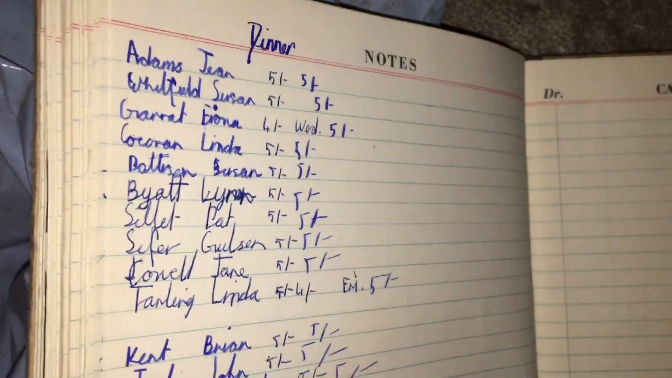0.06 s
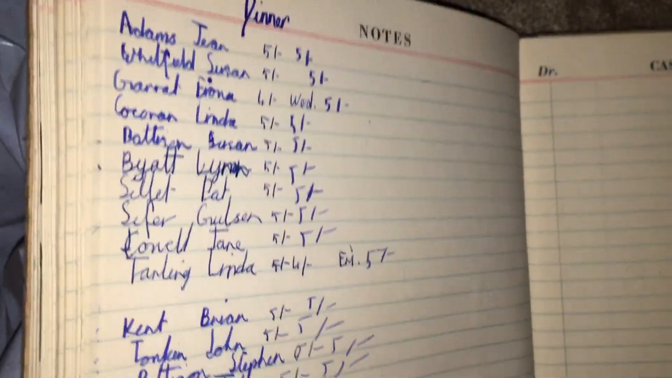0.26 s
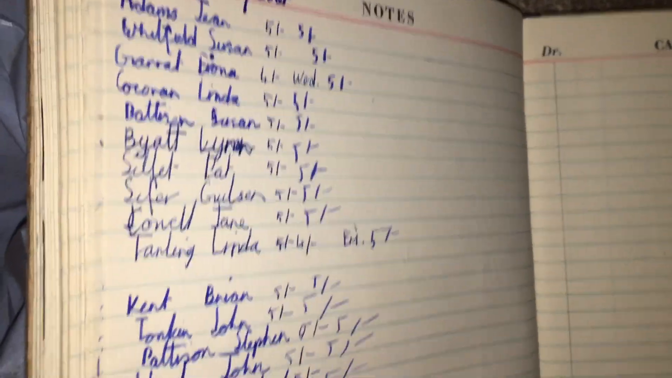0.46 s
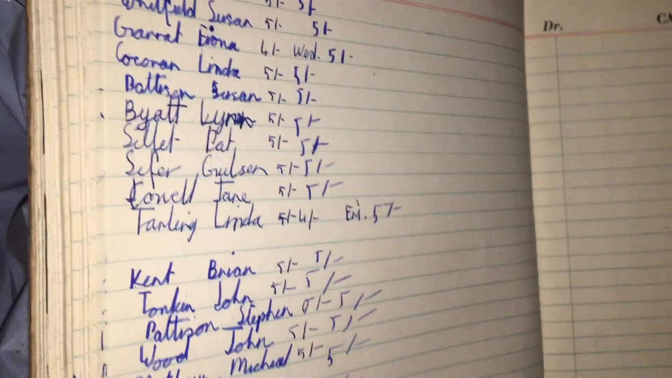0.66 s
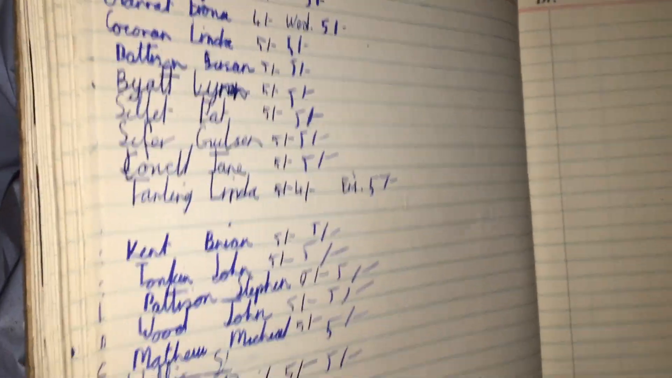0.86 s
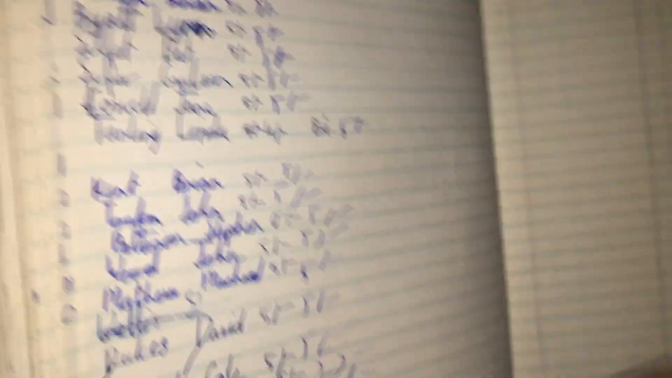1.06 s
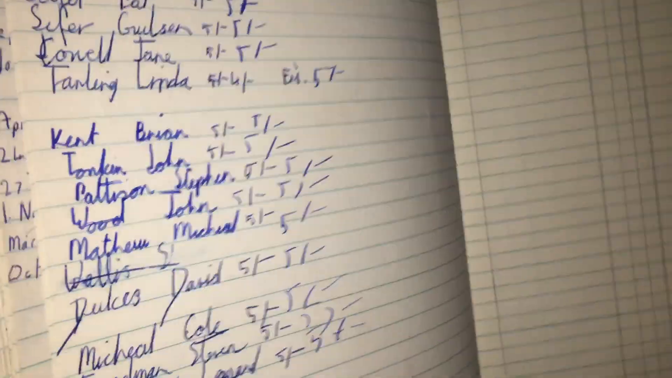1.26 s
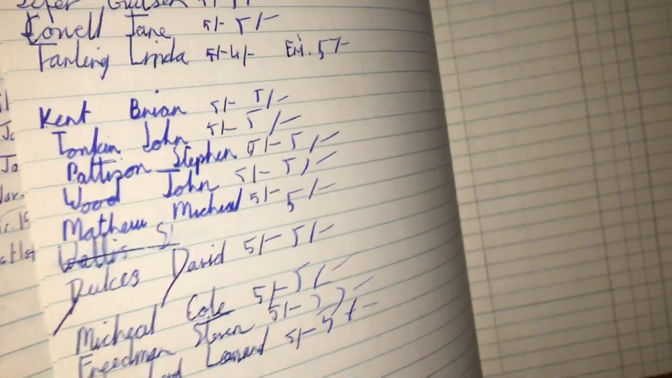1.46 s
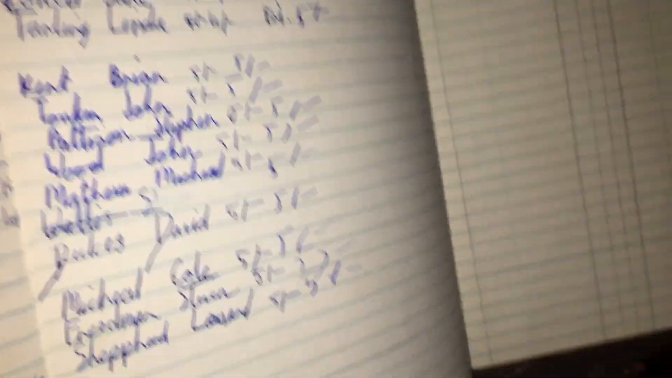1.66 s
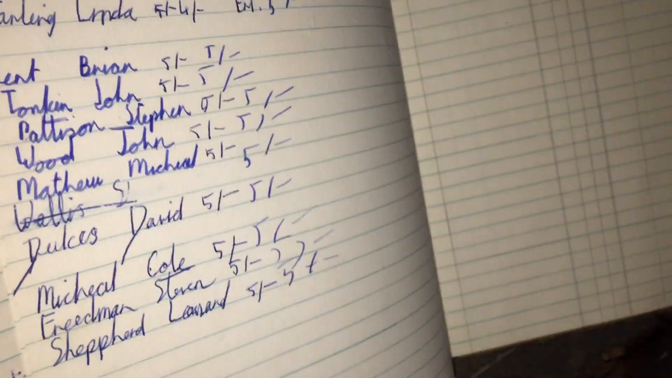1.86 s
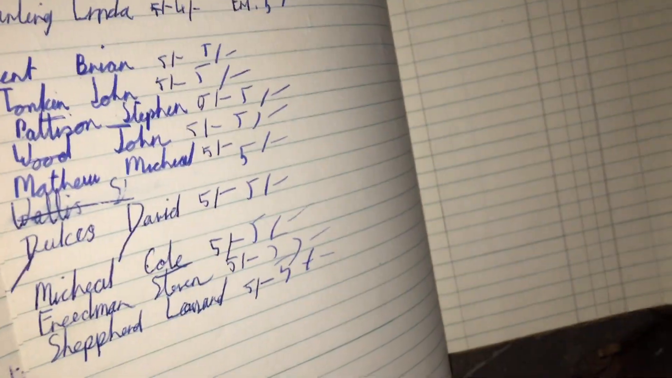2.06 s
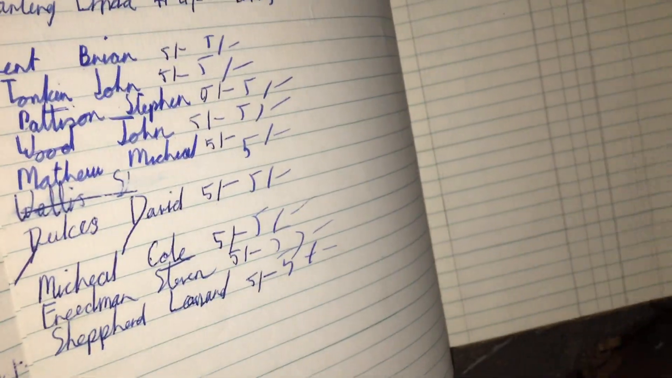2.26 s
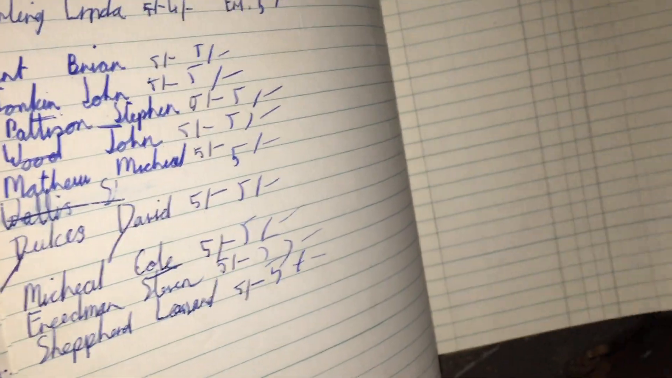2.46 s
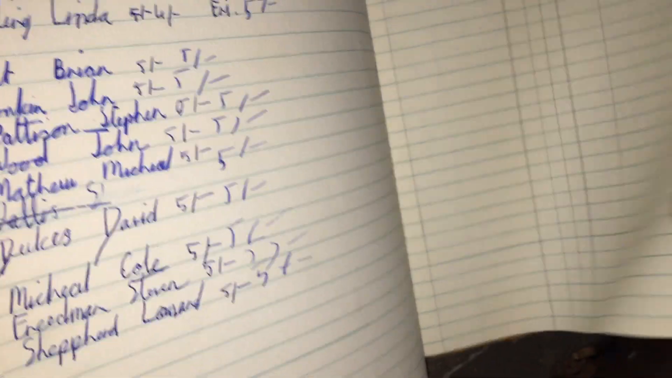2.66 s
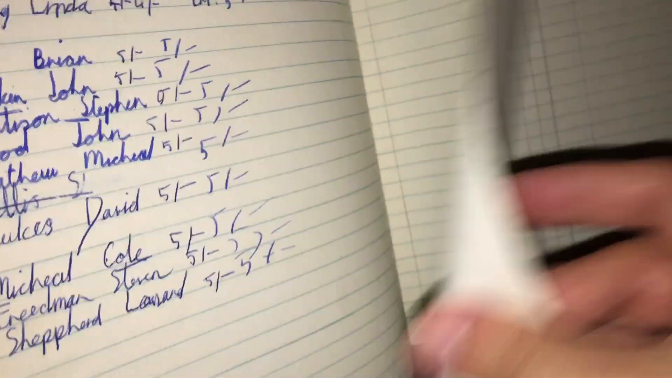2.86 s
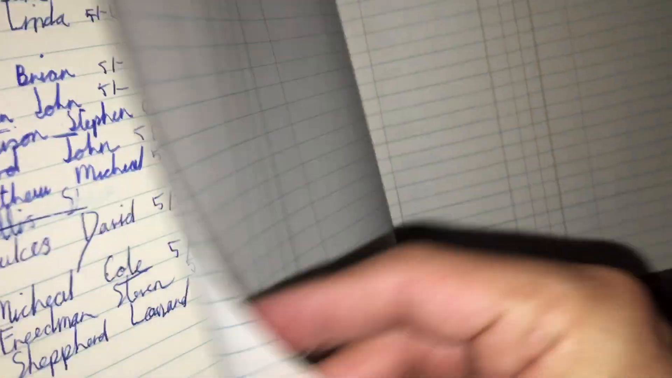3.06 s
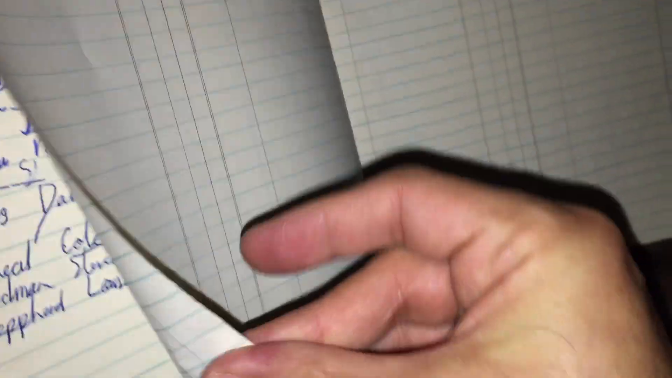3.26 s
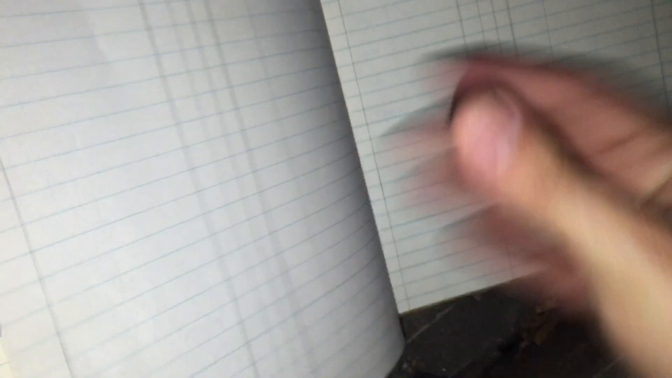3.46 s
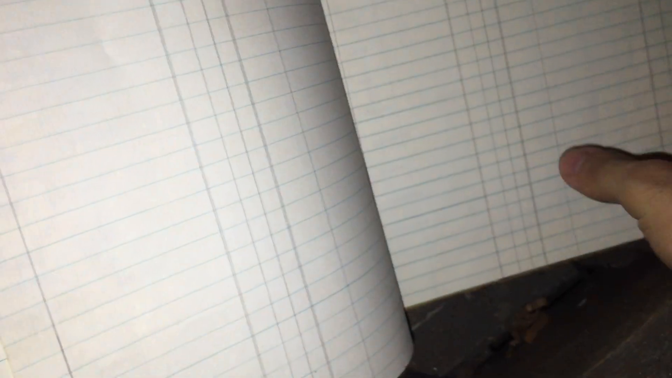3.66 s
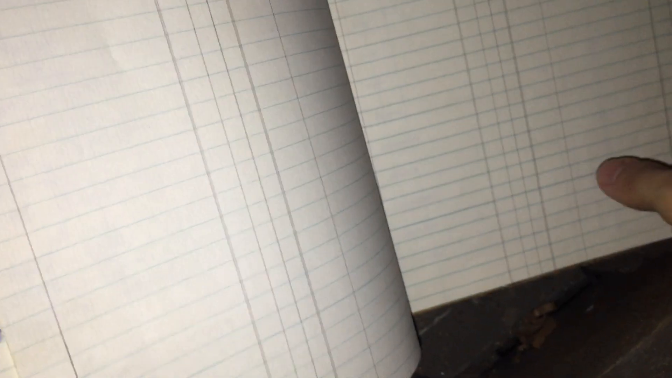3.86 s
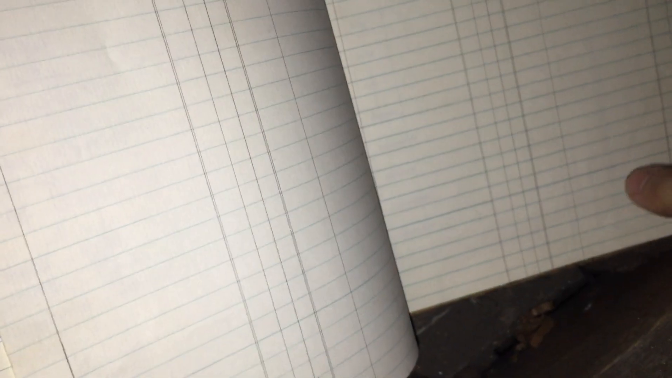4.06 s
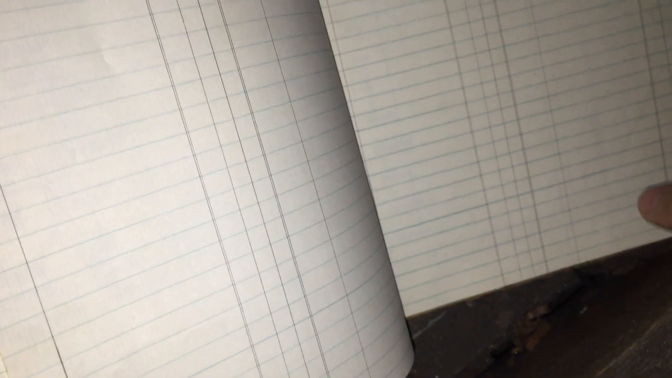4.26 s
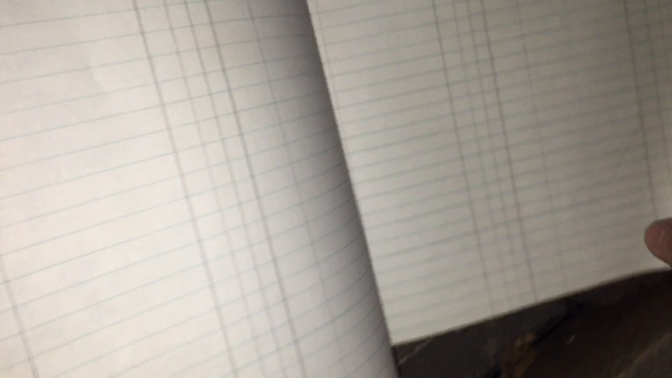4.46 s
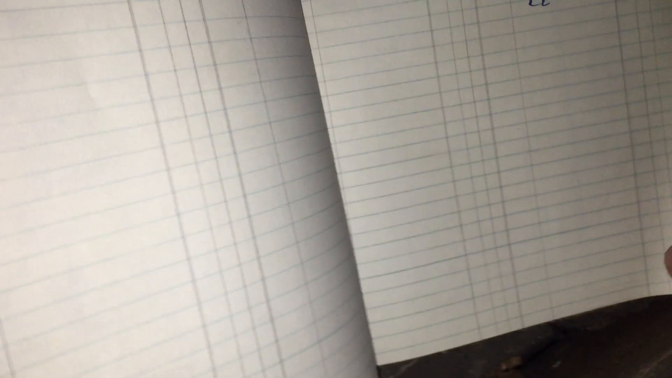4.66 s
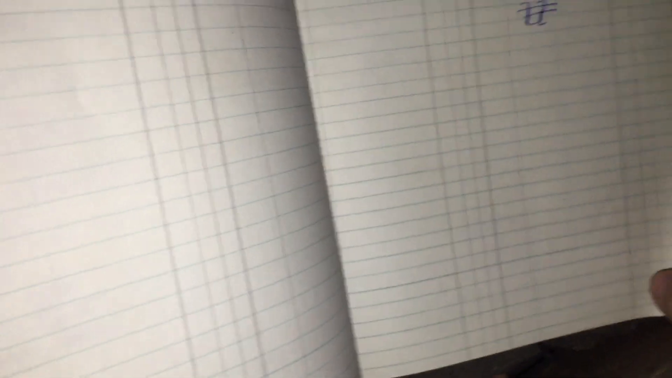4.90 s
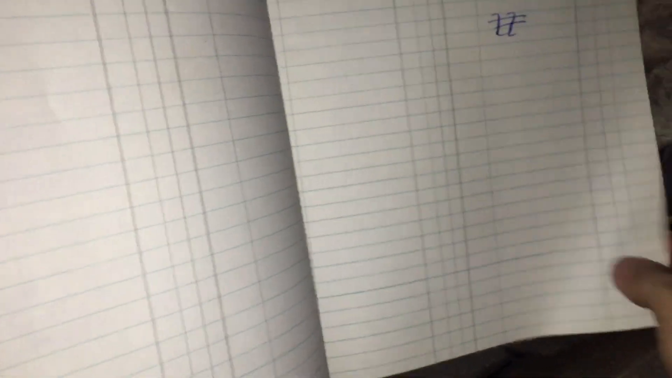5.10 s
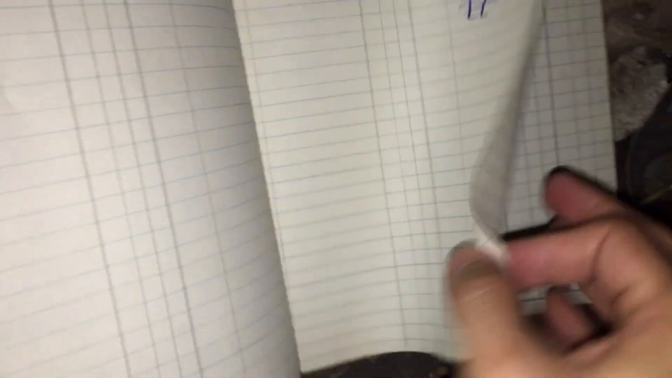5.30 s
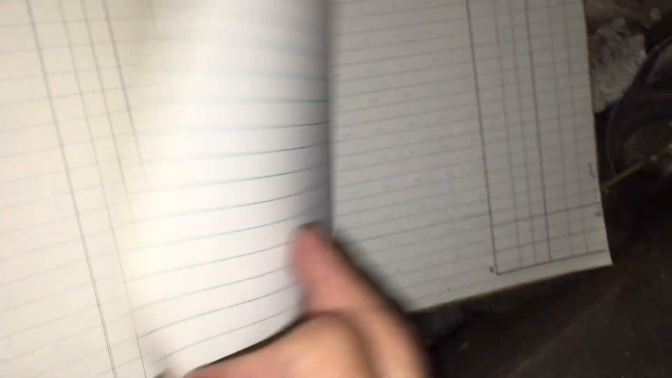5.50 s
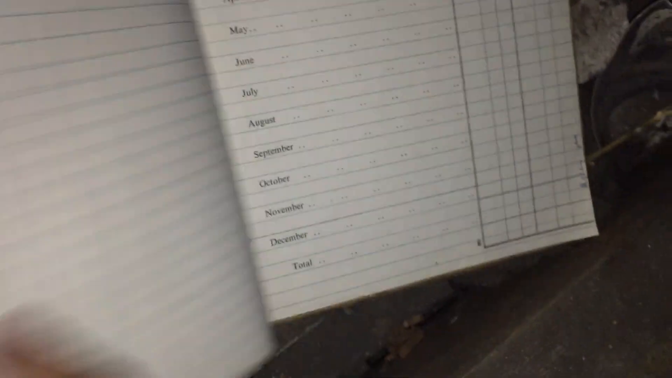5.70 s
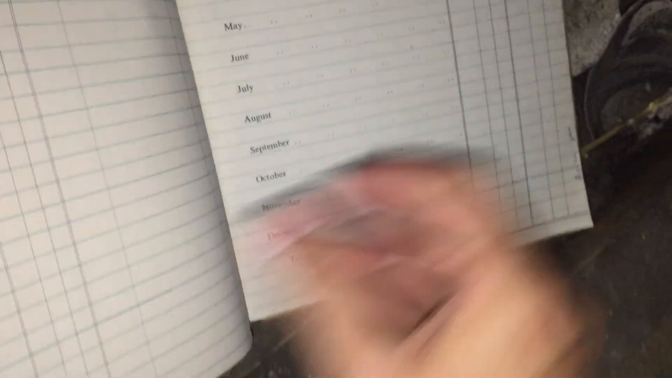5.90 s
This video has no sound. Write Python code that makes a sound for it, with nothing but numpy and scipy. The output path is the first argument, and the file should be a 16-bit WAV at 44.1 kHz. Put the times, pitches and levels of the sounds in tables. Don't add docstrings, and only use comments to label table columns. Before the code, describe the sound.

After quiet hush and faint handling knocks, crisp page rustles and snaps come in bursts, ending with a sharp crack as pages turn over.

```python
import sys
import numpy as np
from scipy import signal
from scipy.fft import rfft, irfft
from scipy.io import wavfile
from scipy.ndimage import uniform_filter1d

SR = 44100
rng = np.random.default_rng(int(sys.argv[2]) if len(sys.argv) > 2 else 0)


def store_wav(level_fs):
    pcm = np.round(np.clip(np.atleast_2d(level_fs), -1, 1) * 32767)
    wavfile.write(sys.argv[1], SR, pcm.T.astype(np.int16))


def rack_gain(trim_db):
    fader = np.asarray(trim_db, float)
    return 10 ** (fader / 20)


N = 261851

# f/Hz, level/dB [per Hz]
ROOM_SPECTRUM = [(240, -38), (400, -16), (645, -15), (964, -17), (1710, -21.5), (2150, -21), (2510, -22.5),
                 (7060, -28.5), (16000, -31)]
# f/Hz, level/dB [per Hz]
RUMBLE_SPECTRUM = [(13, -53), (22, -18), (37, 6.5), (66, 1), (113, -1.5), (220, -11), (290, -47),
                   (480, -120)]
# t/s, rumble level/dB
GRIP_LEVEL = [(0.0, -60), (0.13, -42), (0.2, -54.5), (0.38, -44), (0.59, -57), (1.77, -48), (1.8, -64),
              (1.85, -46), (2.68, -58), (3.08, -53.5), (3.42, -57.5), (3.87, -65.5), (4.15, -58.5),
              (4.45, -56), (5.46, -52.5), (5.7, -59), (5.94, -49)]
# t/s, rumble level/dB
HAND_JOLTS = [
    (2.73, -45.5),
    (3.92, -56),
    (4.53, -56),
    (5.82, -44),
]
# t/s, peak level/dB, f/Hz
CASE_KNOCKS = [(0.1711, -70, 159), (0.2729, -48.5, 202), (0.4266, -42.5, 170), (0.7504, -50, 305),
               (1.0643, -40.5, 283), (1.1178, -42.5, 216), (1.3643, -44.5, 176), (1.4253, -48.5, 165),
               (1.471, -44, 186), (1.5368, -40.5, 172), (1.9485, -46, 172), (2.0419, -36.5, 270),
               (2.0598, -43.5, 264), (2.1726, -34.5, 194), (2.7145, -31, 283), (3.1149, -43.5, 236),
               (4.5468, -41, 217), (5.3732, -41, 268), (5.5082, -41.5, 360)]
# peak t/s, peak level/dB, rise [dB/s], fall [dB/s]
AIR_PUFFS = [(1.521, -53.5, 142, 600), (1.777, -54.5, 460, 400), (3.116, -54.5, 430, 126),
             (5.342, -47, 176, 147), (5.809, -51, 600, 116)]
# start t/s, length [s], level/dB, start f/Hz, end f/Hz
AIR_POCKETS = [(0.994, 0.07, -67, 609, 847), (2.61, 0.025, -60, 880, 820), (1.46, 0.032, -66.5, 2600, 2200),
               (1.266, 0.06, -75, 3780, 2490), (1.328, 0.075, -73, 2820, 2500),
               (2.194, 0.039, -57, 5500, 5500), (2.313, 0.19, -41.5, 3090, 2717),
               (2.316, 0.18, -52, 6600, 5800), (2.318, 0.085, -41, 5630, 5330),
               (2.324, 0.14, -42, 4670, 4300), (2.365, 0.17, -46.5, 3760, 3510),
               (2.401, 0.081, -47, 2370, 2240), (2.714, 0.082, -50, 2800, 3110),
               (2.86, 0.098, -46.5, 3460, 3250), (3.043, 0.085, -49, 2600, 2440),
               (3.045, 0.043, -48, 3600, 3500), (3.091, .052, -42.5, 1200, 1440),
               (3.106, 0.036, -44, 2390, 2610), (3.138, 0.049, -43, 1262, 940),
               (3.167, 0.1, -51.5, 4800, 4230), (3.311, 0.13, -52.5, 3900, 3730),
               (3.6, 0.052, -58, 1125, 1136), (4.022, 0.033, -61, 1500, 1245),
               (4.3, 0.064, -78, 9400, 9200), (5.185, 0.031, -52, 4370, 4510),
               (5.341, 0.021, -37.5, 1545, 1450), (5.432, 0.075, -57.5, 2700, 2510),
               (3.175, 0.05, -41, 12800, 12200), (5.573, 0.041, -54.5, 2616, 2294),
               (5.605, 0.017, -50.5, 1300, 1250), (5.754, 0.029, -75, 4200, 4400),
               (5.811, 0.023, -42, 1500, 1110), (1.741, 0.054, -66, 1320, 1186),
               (2.078, 0.072, -64, 2800, 2730), (2.234, 0.032, -57.5, 2610, 2590),
               (3.482, 0.017, -46.5, 4140, 4300), (3.539, 0.056, -66.5, 2600, 1880),
               (4.322, 0.04, -63, 5870, 5840), (4.761, 0.014, -64, 5330, 5270),
               (4.778, 0.015, -63.5, 6230, 6330)]
# t/s, peak level/dB, ring f/Hz
SHEET_POPS = [(0.243, -58.5, 1220), (0.4243, -55.5, 660), (1.1198, -50, 754), (1.2338, -60, 660),
              (1.235, -62, 1800), (1.422, -50.5, 547), (1.4693, -53, 690), (1.5894, -59, 680.0),
              (1.8877, -59, 910), (2.0111, -47, 1010), (2.0423, -24, 860), (2.0586, -31.5, 850),
              (2.1711, -41, 740), (2.2581, -50, 920), (2.7192, -28, 840), (3.2753, -44, 1900),
              (3.4678, -47, 1570), (3.632, -53, 1080), (4.0317, -41.5, 1500.0), (4.511, -42.5, 1190),
              (4.5434, -33.5, 880), (4.5536, -35.5, 1230), (5.208, -41, 940), (5.243, -29, 830),
              (5.2586, -34.5, 920), (5.2844, -39, 760), (5.3173, -36.5, 930), (5.5072, -37, 756),
              (5.5114, -42.5, 1230), (5.5542, -34, 1160)]
# t/s, peak level/dB, f/Hz, swell [cycles]
DENTS_AND_CRACKLES = [(1.023, -66, 895, 1.5), (1.159, -70, 1210, 1.5), (1.17, -63, 1250, 1.5),
                      (0.424, -62, 1900, 1.7), (1.228, -61.5, 1736, 6.0), (1.248, -65, 600, 0.91),
                      (1.3, -63, 1200, 1.5), (1.589, -59, 2450, 1.7), (2.716, -33, 1500, 0.68),
                      (2.718, -34.5, 2790, 4.2), (3.273, -42.5, 2100, 2.5), (5.258, -46, 2180, 1.1),
                      (5.423, -43, 1272, 9.1), (5.488, -42, 5900, 2.5), (5.539, -53, 2480, 1.5),
                      (5.561, -48, 5500, 3.0), (5.61, -48, 1350, 3.2), (5.638, -52, 3820, 1.9),
                      (5.8, -21.5, 2500, 1.2), (5.8055, -24, 2220, 1.1), (5.81, -34, 2340, 1.2),
                      (5.8285, -26, 2750, 1.8), (5.8345, -20, 2960, 2.2), (5.8474, -6, 6400, 0.52),
                      (5.8475, -21, 1500, 0.5), (5.883, -42, 1330, 1), (0.997, -64, 5200, 4.6),
                      (1.772, -53, 2420, 2.1), (1.784, -52, 3100, 2.5), (1.792, -47, 3060, 1.7),
                      (1.7925, -54, 5840, 3.0), (2.015, -43, 5730, 3.0), (2.0203, -47, 3040, 2.0),
                      (2.021, -43, 5500, 2.7), (2.026, -46, 3970, 1.8), (2.0205, -51, 1050, 1.1),
                      (3.879, -61, 6400, 7.4), (4.03, -50, 3080, 3.8), (4.032, -53, 4300, 7.5),
                      (4.031, -55, 5900, 6.0), (4.069, -67, 2350, 8.4), (4.301, -52, 6000, 6.0),
                      (4.305, -59, 4300, 13), (4.5279, -36.5, 1500, 0.66), (4.5335, -33.5, 1020, 0.48),
                      (4.5433, -26, 9900, 2), (4.553, -37, 6060, 5.4), (4.553, -39.5, 3000, 3.4),
                      (4.572, -51, 5900, 4.0), (4.951, -54, 3570, 2.2),
                      (1.067, -57, 3400, 1.4), (1.067, -62, 7240, 3.0), (2.0424, -30, 3220, 0.92),
                  (2.164, -41.5, 2500, 1.6), (2.7117, -41, 895, 1), (2.858, -46, 5800, 2.2),
                  (3.1085, -46, 5300, 2.2), (3.276, -45.5, 690, 1.8), (4.497, -53, 9000, 2.2),
                  (4.51, -52, 9500, 2.2), (4.541, -27, 7060, 0.69), (5.242, -32, 2600, 0.62),
                  (5.3463, -18.5, 4300, 1.3), (5.362, -36, 6000, 1.5), (5.404, -41, 4300, 1.5),
                  (5.507, -42, 2200, .8), (5.556, -32.5, 3130, 0.46), (5.5532, -45, 1180, 0.79)]
# t/s, peak level/dB, ring f/Hz, top share level/dB
BUCKLES = [(1.0663, -53, 3200, -14), (1.424, -41.5, 7260, -3), (1.5195, -36, 7500, -12),
           (1.7922, -42.5, 3080, 2), (1.8875, -51.5, 3200, -6), (1.9607, -48, 3790.0, 3),
           (1.9766, -44.5, 3960.0, -17), (2.0111, -38, 5670, -3), (2.04, -23, 3620, -18),
           (2.0426, -19.5, 2990, -21), (2.171, -38, 2740, -18), (2.567, -35, 2850, -9),
           (3.0402, -39, 7900, 3), (3.155, -31, 1860, -28), (3.2748, -33.5, 1970, -24),
           (3.4657, -22, 2830, -20), (3.4682, -30, 1630, -22), (3.506, -52, 9000, 4)]
# t/s, peak level/dB, ring f/Hz, top share level/dB
THUMB_RUN = [(4.505, -43, 9000.0, -1.0), (4.515, -38, 6000.0, 3.0), (4.522, -41, 8500.0, 0),
             (4.5285, -30.5, 4170, -7), (4.537, -25.5, 6900, -8), (4.5391, -20, 4200, 3),
             (4.545, -31.5, 4050, -16), (4.5542, -27, 4300, -12), (4.57, -37.5, 2860, 2),
             (4.572, -39, 4240, -11), (4.5815, -45, 4180, -9), (4.5898, -46.5, 4180.0, -16)]
# t/s, peak level/dB, ring f/Hz, top share level/dB
BUNDLE_CREASES = [(4.9457, -37, 2980, 9), (4.949, -44, 6350, 7), (5.0988, -32.5, 4140, -37),
                  (5.208, -26, 2700, -12), (5.347, -17.5, 3200, -37), (5.363, -35, 2330, -25),
                  (5.4036, -39, 3040.0, -15), (5.5058, -46, 1890.0, -18.0), (5.555, -32, 2450, -28),
                  (5.612, -33.5, 6100, -31), (5.8009, -27, 2280, -27), (5.8064, -14, 2106, -40),
                  (5.8297, -26, 2900.0, -12.0), (5.836, -18, 2950, -27), (5.8493, -17, 6640, -33)]
BLOCK_MODES = [1500, 3200, 3960, 5500, 9200, 11800]
# f/Hz, level/dB [per Hz]
PAPER_SPECTRUM = [(260, -47), (450, -22), (563, -11.5), (737, -2), (1120, -4), (1190, 2.5), (1630, -6.5),
                  (2040, -6), (2910, -4), (4170, -4.5), (6060, -8.5), (7580, -10.5), (10400, -10.5),
                  (12600, -11.5), (16000, -17.5)]
PART_BORDERS = [450, 1900, 4800, 7500, 16000]
# start t/s, length [s], level/dB, swell [dB], brightness [dB/octave]
FINGER_SLIDES = [(2.087, 0.033, -55.5, 1, -0.5), (2.2, 0.026, -48.5, 8, -1.8),
                 (2.285, 0.067, -55.5, 11, 0.5), (2.357, 0.09, -37, 1, -3), (2.452, 0.12, -45.5, 0, -1),
                 (2.583, 0.12, -55.5, 7, -2), (2.717, 0.1, -39.5, -8, -1), (2.855, 0.095, -42.5, -5, 1.5),
                 (3.046, 0.046, -42, -4.5, 1.5), (3.123, 0.016, -47.5, 0, -1.5),
                 (3.172, 0.018, -40, 0.5, 3.5), (3.192, 0.078, -43, -8.5, 3), (3.318, 0.089, -47, -4.5, 3),
                 (3.419, 0.087, -47.5, -1.5, 0.5), (5.185, 0.019, -56, 9, 0.5),
                 (5.227, 0.014, -41.5, 4.5, -2.5), (5.266, 0.051, -49.5, -3, -2),
                 (5.352, 0.025, -40.5, -30, -9), (5.406, 0.018, -47.5, 7, 1.5), (5.451, 0.045, -50.5, 2, 3),
                 (5.578, 0.048, -50.5, 0, 0.5), (5.757, 0.033, -59.5, 10.5, -5),
                 (5.803, 0.036, -42, 10.5, -2.5), (5.836, 0.043, -41, 1.5, 3), (5.905, 0.0097, -43, -11, 1)]
# start t/s, length [s], level/dB, brightness [dB/octave]
FINGER_BRUSHES = [(1.057, 0.013, -66, -4), (1.42, 0.046, -60.5, 2.5), (1.492, 0.046, -59.5, 3.5),
                  (1.764, 0.038, -59.5, 0.5), (1.885, 0.0069, -68, 4.5), (1.927, 0.18, -65.5, -1.5),
                  (2.014, 0.046, -52, 2), (2.044, 0.012, -32.5, 1), (2.169, 0.0064, -45, -2),
                  (2.14, 0.016, -65.5, 2.5), (2.253, 0.012, -54, -2.5), (2.836, .025, -62, -15),
                  (3.023, 0.012, -58, 1.5), (3.271, 0.0078, -55, -8), (3.481, 0.015, -51, -8),
                  (3.55, 0.042, -73, 7), (3.804, 0.029, -62.5, -1), (3.902, 0.012, -67, 4),
                  (4.029, 0.041, -59.5, 1), (4.299, 0.085, -61.5, 2), (4.448, 0.013, -65.5, 4),
                  (4.501, 0.057, -58, 1), (4.541, 0.006, -33.5, 2.5), (4.569, 0.024, -61, 2),
                  (4.777, 0.02, -64.5, 2), (4.957, 0.0065, -60, 0), (5.096, 0.037, -52.5, -5),
                  (5.324, .005, -48, 0), (5.551, .008, -59, 0), (5.712, 0.057, -65, -4)]
# start t/s, length [s], level/dB, swell [dB]
SHEET_FLEXES = [(0.986, 0.048, -74.5, 10), (1.067, 0.0073, -64.5, 5), (1.499, 0.034, -60, 7.5),
                (1.75, 0.023, -61.5, -2), (1.938, 0.067, -63.5, -3), (2.037, 0.017, -37.5, 0),
                (2.72, 0.044, -39.5, -11), (3.098, 0.049, -37, 0), (3.163, 0.031, -36, -12),
                (3.277, 0.019, -44.5, -11), (3.463, 0.003, -39, 3.5), (3.542, 0.11, -60, -10),
                (3.652, 0.056, -67, -3), (3.777, 0.039, -68.5, 2), (4.032, 0.057, -53, -21),
                (4.524, 0.041, -47, -2), (4.947, 0.0073, -60.5, -5), (5.226, 0.022, -49, 3),
                (5.259, 0.089, -55.5, 15.5), (5.341, 0.051, -41.5, -3.5), (5.423, 0.021, -39.5, -8.5),
                (5.505, 0.04, -50.5, -15.5), (5.555, 0.013, -53.5, 0), (5.593, 0.04, -57, 8),
                (5.758, 0.04, -57.5, 8), (5.799, 0.056, -37.5, 2.5), (5.851, 0.062, -46, 0)]
# start t/s, length [s], level/dB, swell [dB]
SKIN_DRAGS = [(2.295, 0.054, -46.5, 10.5), (2.345, 0.077, -51, -8), (3.324, 0.095, -38.5, -18),
              (3.424, 0.07, -48.5, 3.5), (3.864, 0.023, -66, -5), (4.306, 0.065, -65, -8.5),
              (4.439, 0.014, -66, 0), (4.773, 0.013, -77, 1), (5.107, 0.016, -55, 2),
              (5.419, 0.019, -41.5, -1.5), (5.907, 0.01, -43, -7)]
# t/s, level/dB
RESTING_HAND = [(0.93, -100), (1.03, -70.5), (1.4, -72.5), (1.7, -78), (2.1, -69.5), (3.6, -70.5),
                (4.3, -74), (5.7, -64.5), (5.94, -59)]
SLIDE_SHARE = [-12.5, -5.5, -8, -7]
FLEX_SHARE = [-4.5, -12, -20.5, -21]
DRAG_SHARE = [-34.5, -16, -6, -9]
REST_SHARE = [-6.5, -12, -16.5, -14.5]
BRIGHT_REACH = [1, -0.65, 0.14, 1.5]
# f/Hz, width [Hz], level/dB
PORT_RESONANCES = [(2836, 53, 3.5), (4300, 150, 2), (4990, 340, -3.5), (6100, 690, 3), (9260, 450, 1.5),
                   (10480, 870, -5)]


def rms_one(x):
    return x / np.sqrt(np.mean(x ** 2) + 1e-20)


def level_in_time(rows):
    s, db = np.transpose(rows)
    return np.interp(np.arange(N) / SR, s, db)


def every_sample(coarse, step):
    return np.interp(np.arange(N) / step, np.arange(len(coarse)), coarse)


def at_hz(points, hz):
    known_hz, db = np.array(points).T
    return np.interp(np.log(hz), np.log(known_hz), db)


def coloured_noise(points):
    hz = np.maximum(np.fft.rfftfreq(N, 1 / SR), 1)
    return rms_one(irfft(rfft(rng.standard_normal(N)) * rack_gain(at_hz(points, hz)), N))


def drift(rate):
    r = np.exp(-80 * np.pi * rate / SR)
    slow = signal.lfilter([1], [1, -2 * r, r * r], rng.standard_normal(N // 40 + 2002))[2000:]
    return every_sample(rms_one(slow), 40)


def resonance(x, hz, width):
    r = np.exp(-np.pi * width / SR)
    poles = [1, -2 * r * np.cos(2 * np.pi * hz / SR), r * r]
    return signal.lfilter(np.array([1, 0, -1]) * (1 - r * r) / 2, poles, x)


def band(x, low_hz, high_hz, order=2):
    return signal.sosfilt(signal.butter(order, [low_hz, high_hz], "band", fs=SR, output="sos"), x)


def place(events, shapes):
    out = np.zeros(N + 2000)
    for (s, peak_db, *_), shape in zip(events, shapes):
        at = round(s * SR)
        out[at:at + len(shape)] += rack_gain(peak_db) * shape / np.abs(shape).max()
    return out[:N]


def tents(s, db, rise, fall):
    late = np.arange(0, N + 40, 40) / SR - np.c_[s]
    slope_db = np.minimum(np.c_[rise] * late, -np.c_[fall] * late)
    return every_sample(rack_gain(np.c_[db] + slope_db).sum(axis=0), 40)


def room_hush():
    return rack_gain(-73.5) * coloured_noise(ROOM_SPECTRUM)


def grip(lumpy_db, creak_db):
    rumble_db = level_in_time(GRIP_LEVEL)
    tremor = coloured_noise(RUMBLE_SPECTRUM)
    rumble = rms_one(tremor * rack_gain(lumpy_db * drift(6.9) + 2.63 * drift(45)))
    skin = band(rng.standard_normal(N), 152, 376, order=3)
    creak = rms_one(skin * rack_gain(lumpy_db * drift(21)))
    jolt_s, jolt_db = np.transpose(HAND_JOLTS)
    rumble_gain = rack_gain(rumble_db) + tents(jolt_s, jolt_db, rise=276, fall=276)
    return rumble_gain * rumble + rack_gain(creak_db + 0.36 * (rumble_db + 48.5)) * creak


def thuds(events, push_cycles, ring_cycles, tick_db):
    t, shapes = np.arange(2000) / SR, []
    for s, peak_db, hz in events:
        push = 0.36 + rng.standard_normal(len(t))
        burst = push * (1 - np.exp(-t * hz * 210.0)) * np.exp(-t * hz / push_cycles)
        body = resonance(resonance(burst, hz, hz / ring_cycles), hz, hz)
        tick = rms_one(band(burst, 1.3 * hz, 4 * hz, order=3))
        shapes.append(rms_one(body) + rack_gain(tick_db + 0.27 * (peak_db + 26)) * tick)
    return place(events, shapes)


def puffs():
    air = band(rng.standard_normal(N), 190, 426)
    wedge = rms_one(air + 1.8 * resonance(air, 327, 47))
    return tents(*np.transpose(AIR_PUFFS)) * rack_gain(2.0 * drift(37)) * wedge


def pockets(sharp, edge):
    out, size = np.zeros(N + SR), SR // 3
    for s, length, db, start_hz, end_hz in AIR_POCKETS:
        catches = rng.standard_normal(size) + 1j * rng.standard_normal(size)
        catches = catches * rack_gain(4.0 * np.minimum(rng.exponential(1, size), 4))
        part = np.arange(int(length * SR)) / (length * SR)
        centre_over_width = max(sharp + 0.091 * (db + 46.5), 2)
        r = np.exp(-np.pi * (start_hz + end_hz) / 2 / centre_over_width / SR)
        slow = signal.lfilter([1], [1, -2 * r, r * r], catches)[500:500 + len(part)]
        glide_hz = start_hz + (end_hz - start_hz) * part
        tone = np.real(slow * np.exp(2j * np.pi * np.cumsum(glide_hz) / SR))
        at = round(s * SR)
        out[at:at + len(part)] += rack_gain(db) * rms_one(tone) * np.sin(np.pi * part) ** edge
    return out[:N]


def dents():
    t, shapes, events = np.arange(1500) / SR, [], DENTS_AND_CRACKLES
    for s, peak_db, hz, cycles in events:
        shapes.append(t * np.exp(-t * hz / cycles) * np.sin(2 * np.pi * hz * t))
    return place(events, shapes)


def snaps(sharp, crack_s, tail_s, tail_db):
    t, shapes, events = np.arange(1500) / SR, [], [*BUCKLES, *THUMB_RUN, *BUNDLE_CREASES]
    modes = np.array(BLOCK_MODES)
    for s, peak_db, hz, top_db in events:
        a, b = rng.standard_normal((2, len(t)))
        crack = a * (1 - np.exp(-t / 0.000084)) * np.exp(-t / crack_s)
        skirt_hz = hz * rack_gain(13 + top_db / 3)
        ring = resonance(resonance(crack, hz, hz / sharp), hz, skirt_hz)
        reach_db = -6.0 * np.abs(np.log2(modes / hz)) + 5.5 * rng.standard_normal(len(modes))
        reach_db += np.minimum(top_db + 8, 0) * (modes > max(1.5 * hz, 5000))
        block = sum(rack_gain(db) * rms_one(resonance(crack, f, 270)) for f, db in zip(modes, reach_db))
        top = band(b * np.exp(-t / (2.1 * crack_s)), 8300, 13100, order=3)
        rustle = band(b * np.exp(-t / tail_s), hz / 1.17, min(2.0 * hz, 15000))
        parts = [(ring, 0), (block, -4), (top, top_db + 2.5), (rustle, tail_db)]
        shapes.append(sum(rack_gain(db) * p / np.abs(p).max() for p, db in parts))
    return place(events, shapes)


def stroke_gains(attack, release, brush_swell_db, bite_db, cut_db):
    slide, bright = np.array(SLIDE_SHARE), np.array(BRIGHT_REACH)
    rows = [(*r[:4], *(slide + r[4] * bright)) for r in FINGER_SLIDES]
    rows += [(*r[:3], brush_swell_db, *(slide + r[3] * bright)) for r in FINGER_BRUSHES]
    rows += [(*r, *FLEX_SHARE) for r in SHEET_FLEXES]
    rows += [(*r, *DRAG_SHARE) for r in SKIN_DRAGS]
    s, length, db, swell = np.array(rows)[:, :4].T[..., None]
    share_db = np.array(rows)[:, 4:].T
    late = np.arange(0, N + 80, 80) / SR - s
    bite = attack * (1 + np.maximum(-swell, 0) / bite_db)
    cut = release * (1 + np.maximum(swell, 0) / cut_db)
    db = db + swell * np.clip(late / length, 0, 1)
    db = db + bite * np.minimum(late, 0) - cut * np.maximum(late - length, 0)
    power = rack_gain(2 * share_db) @ rack_gain(2 * db)
    power = np.array([every_sample(p, 80) for p in power])
    return np.sqrt(power + rack_gain(2 * (level_in_time(RESTING_HAND) + np.c_[REST_SHARE])))


def rubbing(grain_db, wander_db, jerk_db, sharp):
    jerk = rack_gain(jerk_db * drift(75) + 1.46 * drift(530))
    gains = stroke_gains(attack=1806, release=988, brush_swell_db=-9.5, bite_db=33, cut_db=24)
    out = np.zeros(N)
    for gain, low, high in zip(gains, PART_BORDERS, PART_BORDERS[1:]):
        part = np.zeros(N)
        edges = np.geomspace(low, high, 8)
        for hz in np.sqrt(edges[1:] * edges[:-1]):
            catches = rack_gain(grain_db * np.minimum(rng.exponential(1, N), 4)) * rng.choice([-1, 1], N)
            width = hz * np.log(high / low) / sharp
            mode = rms_one(resonance(resonance(catches, hz, width), hz, 2 * width))
            mode_db = at_hz(PAPER_SPECTRUM, hz) + wander_db * (2000 / hz) ** 0.099 * drift(10.0)
            part += rack_gain(mode_db) * np.sqrt(hz) * mode
        part /= np.sqrt(uniform_filter1d(part ** 2, size=3000))
        out += gain * part * jerk
    return out


def scene():
    hand = grip(lumpy_db=2.5, creak_db=-69.0)
    hand += thuds(CASE_KNOCKS, push_cycles=0.55, ring_cycles=1.58, tick_db=-18)
    air = puffs() + pockets(sharp=4.3, edge=0.35)
    paper = thuds(SHEET_POPS, push_cycles=0.93, ring_cycles=4.4, tick_db=-10.0) + dents()
    paper += snaps(sharp=12.2, crack_s=0.00039, tail_s=0.0069, tail_db=-9.0)
    paper += rubbing(grain_db=3.8, wander_db=2.5, jerk_db=1.3, sharp=13.0)
    return (room_hush() + hand + air + paper)[None]


def roll_off(x):
    return signal.sosfilt(signal.butter(12, 16820, fs=SR, output="sos"), x)


def record(dry):
    x = dry[0]
    for hz, width, gain_db in PORT_RESONANCES:
        x = x - (1 - rack_gain(gain_db)) * resonance(x, hz, width)
    x = signal.sosfilt(signal.butter(3, 57, "high", fs=SR, output="sos"), x)
    x = signal.sosfilt(signal.ellip(10, 0.3, 55, 15750, fs=SR, output="sos"), x)
    return roll_off(x[None])


dry = scene()
out = record(dry)
store_wav(out)
```